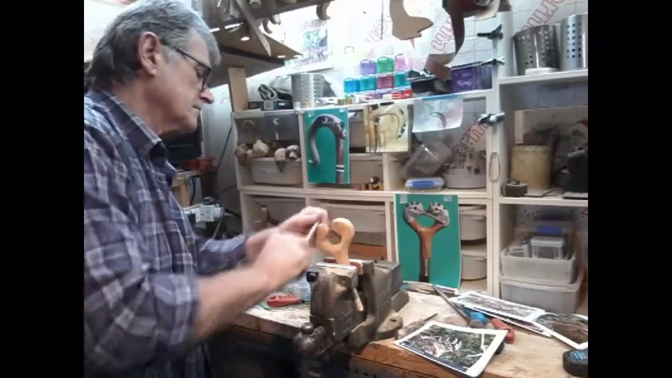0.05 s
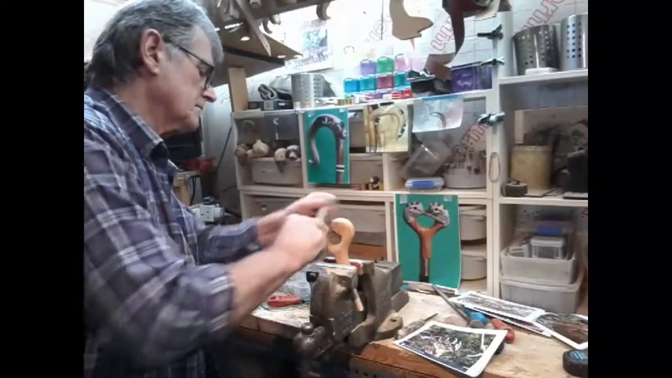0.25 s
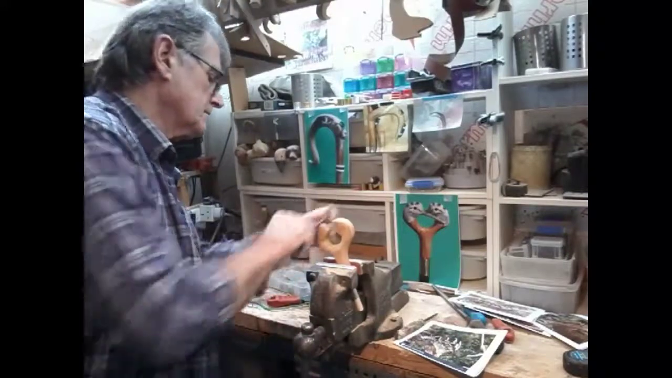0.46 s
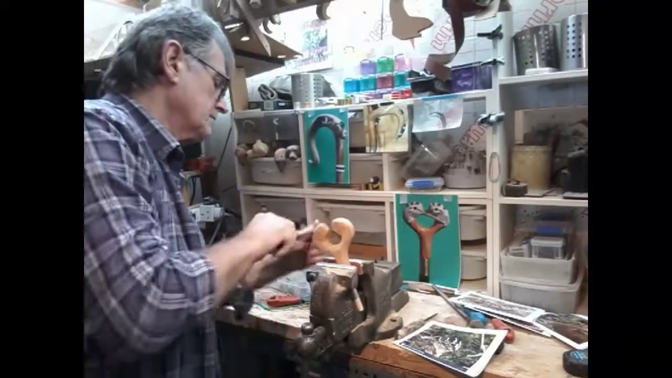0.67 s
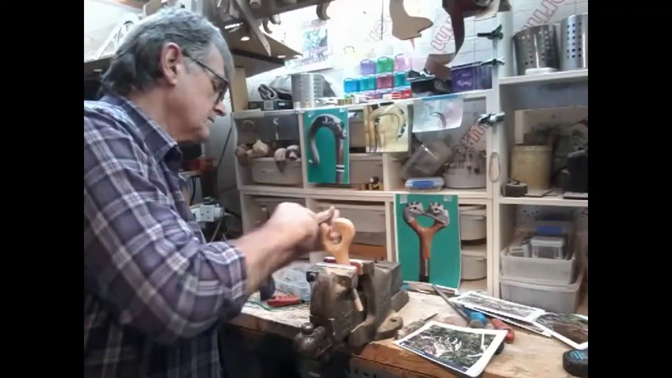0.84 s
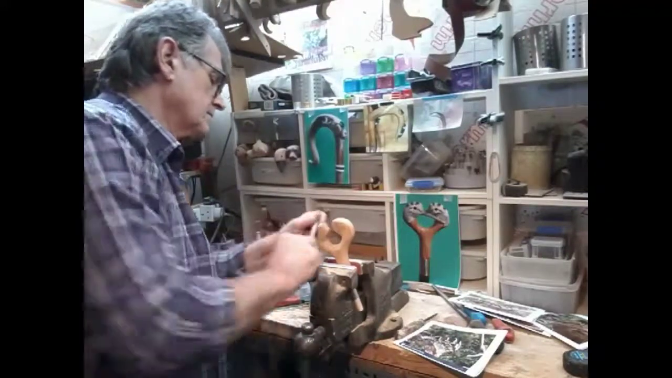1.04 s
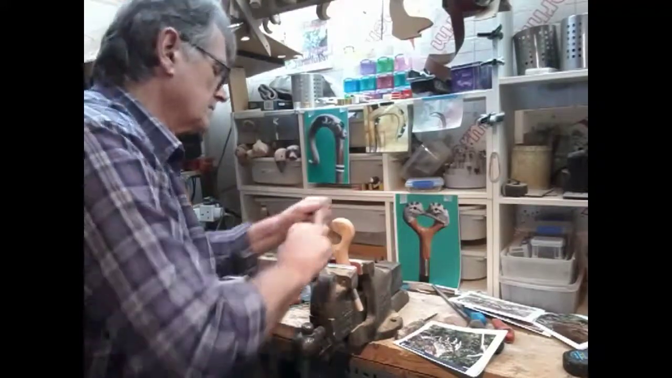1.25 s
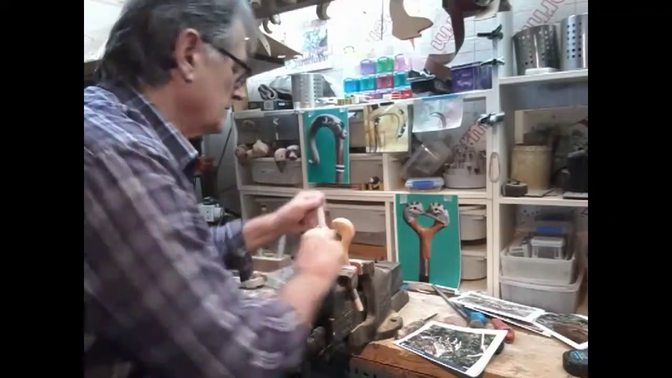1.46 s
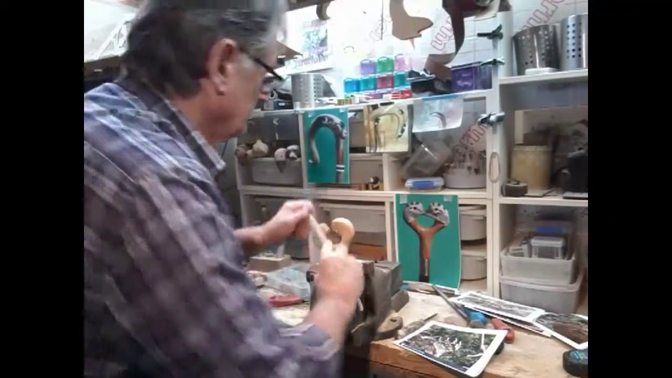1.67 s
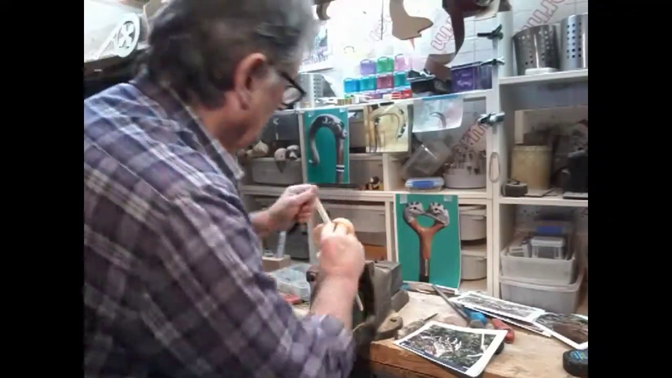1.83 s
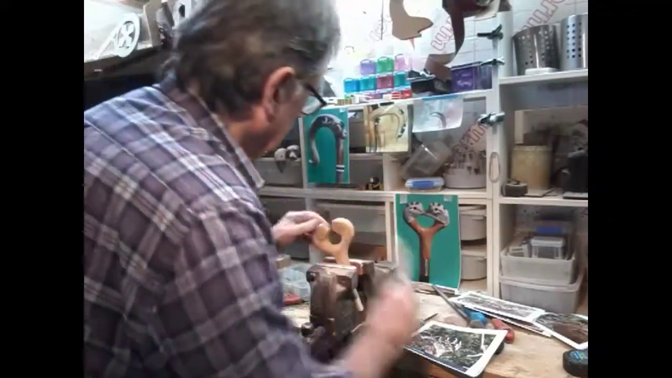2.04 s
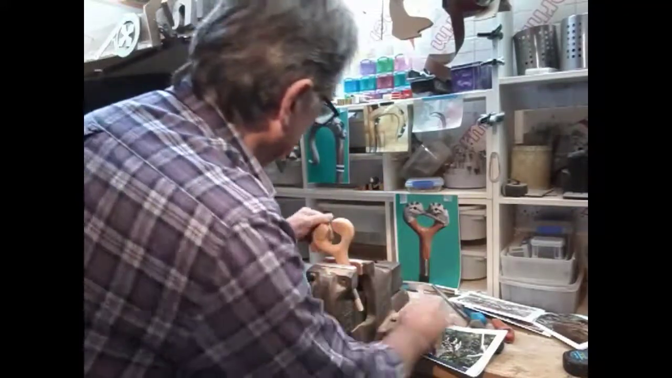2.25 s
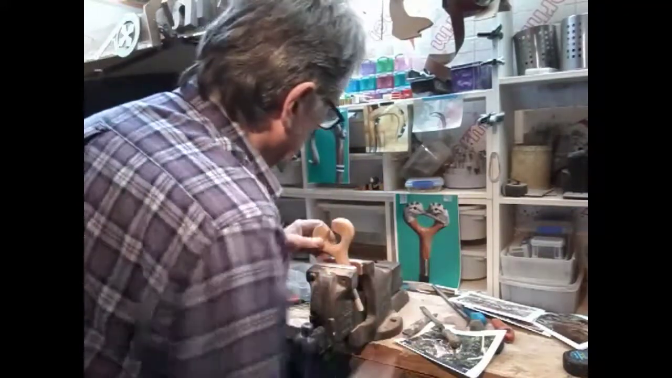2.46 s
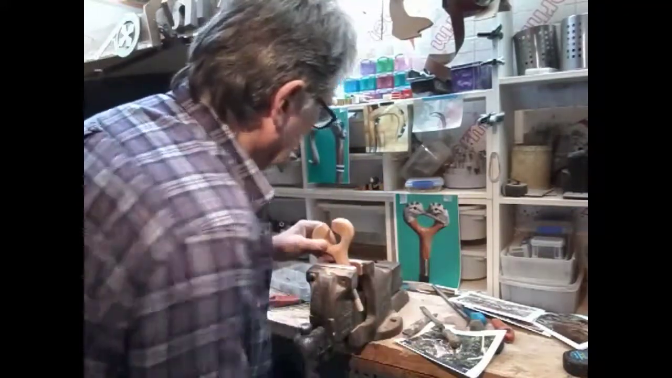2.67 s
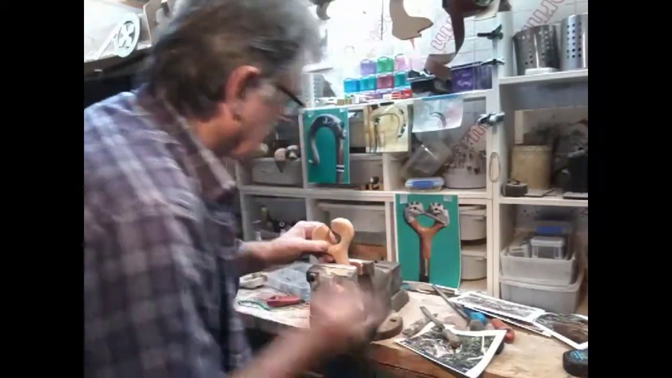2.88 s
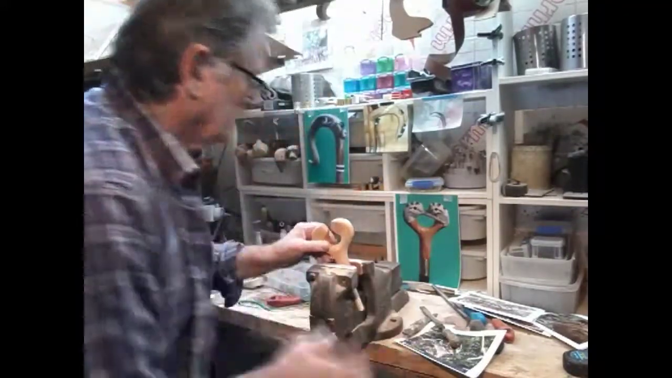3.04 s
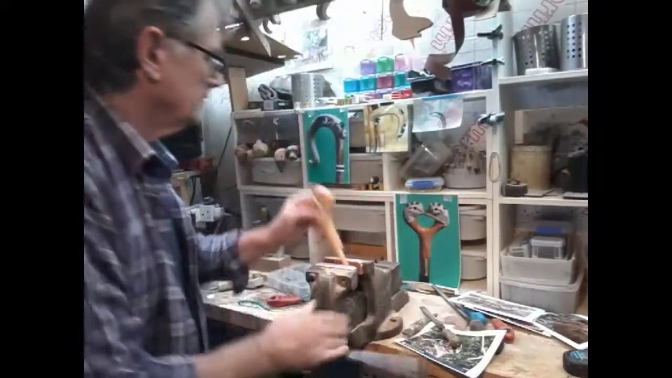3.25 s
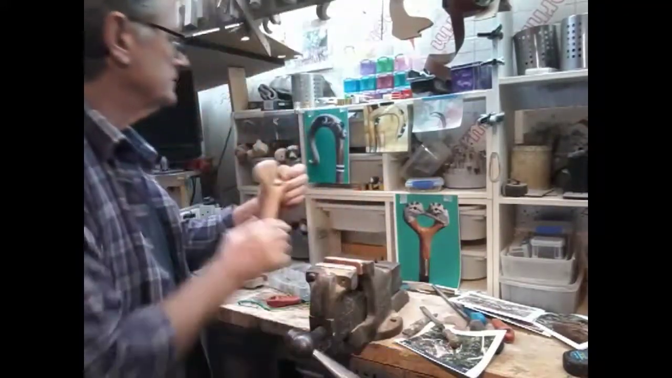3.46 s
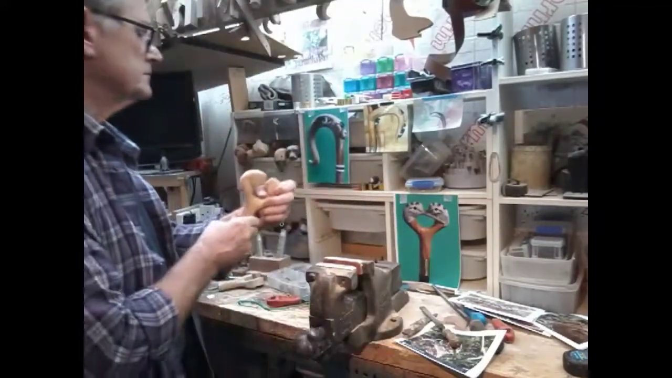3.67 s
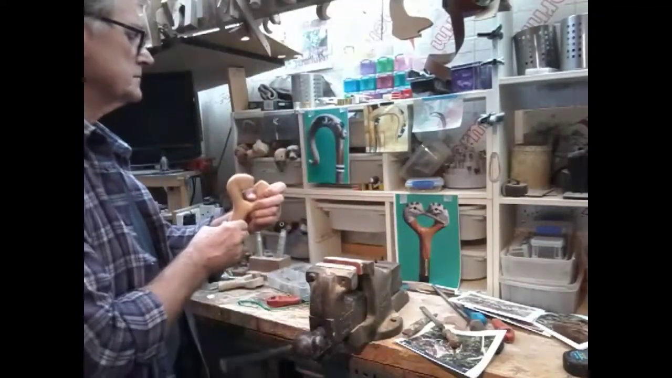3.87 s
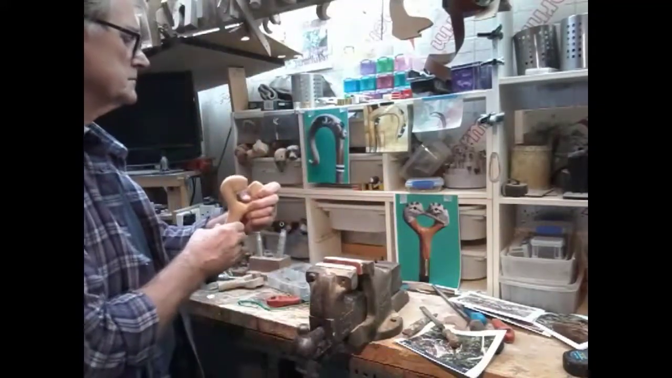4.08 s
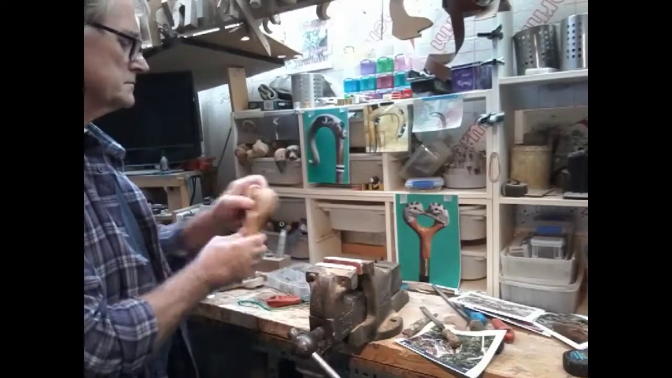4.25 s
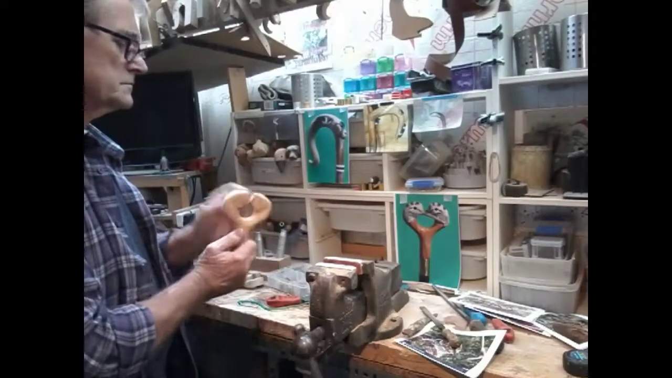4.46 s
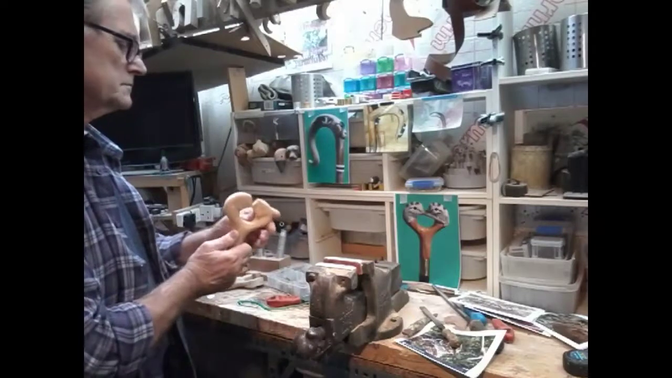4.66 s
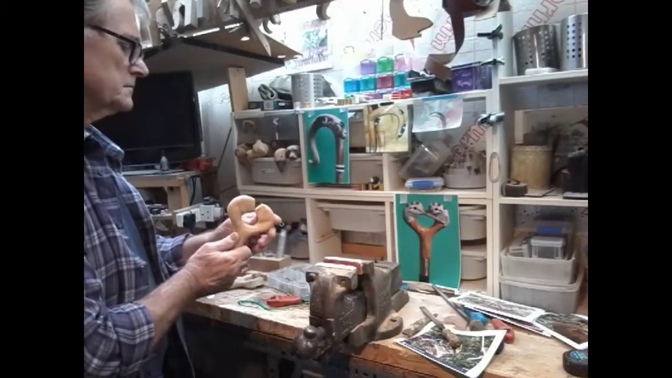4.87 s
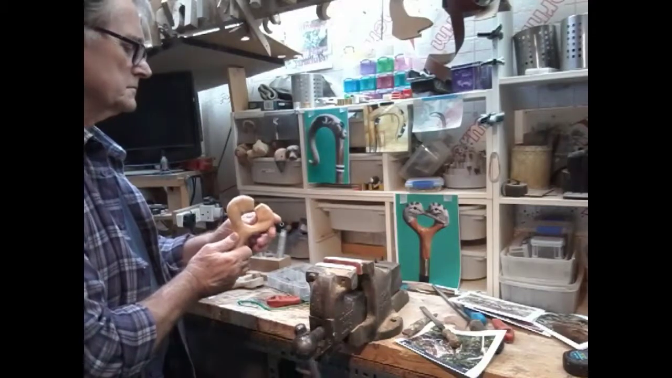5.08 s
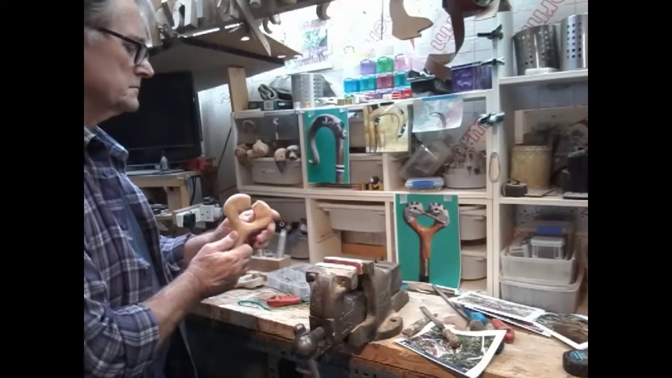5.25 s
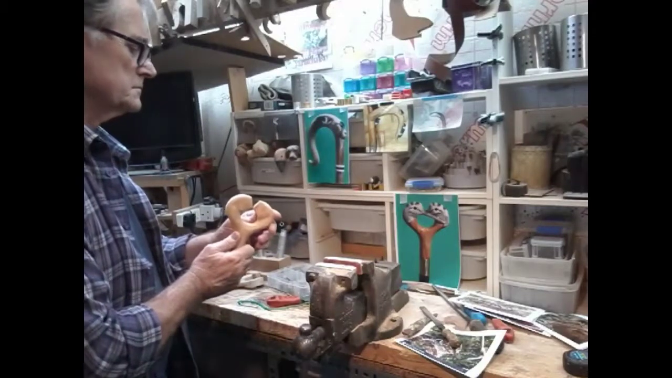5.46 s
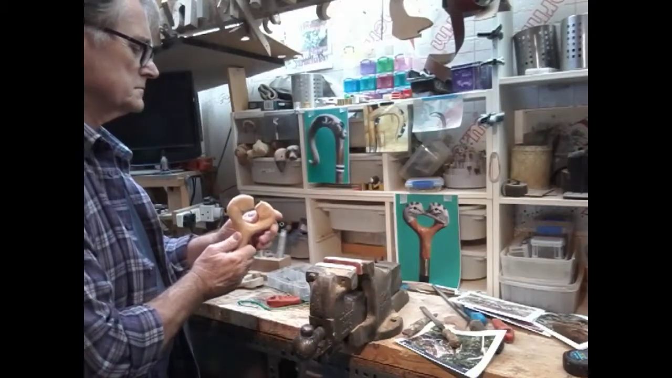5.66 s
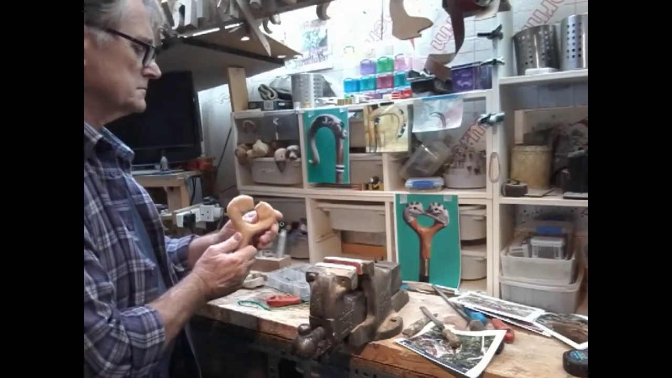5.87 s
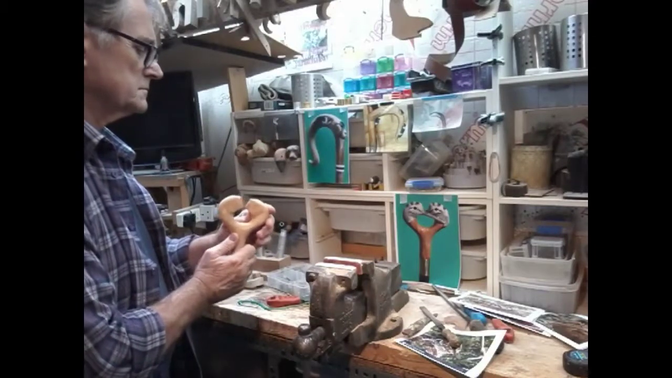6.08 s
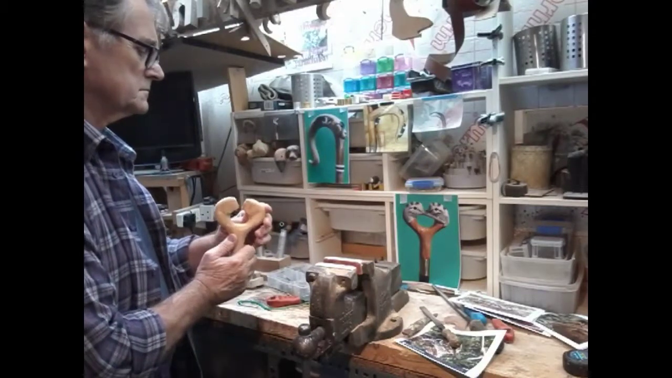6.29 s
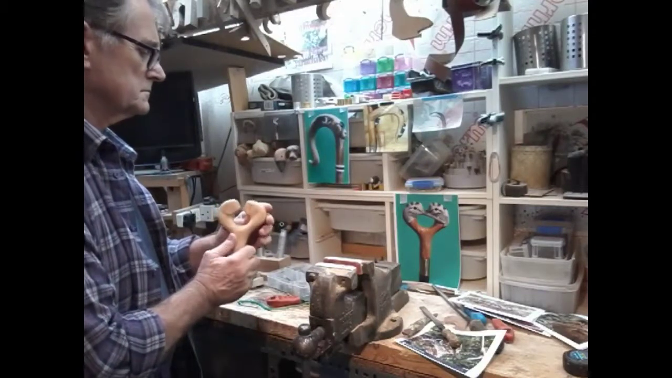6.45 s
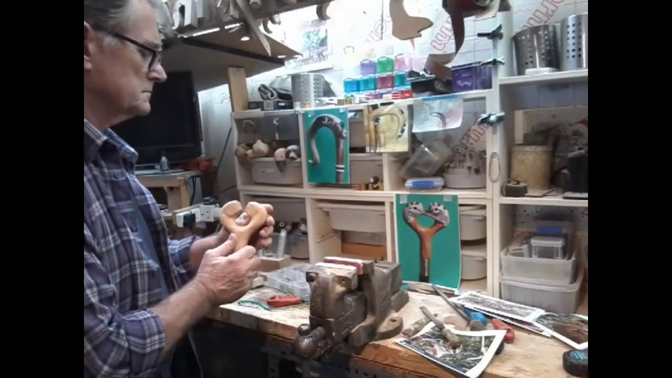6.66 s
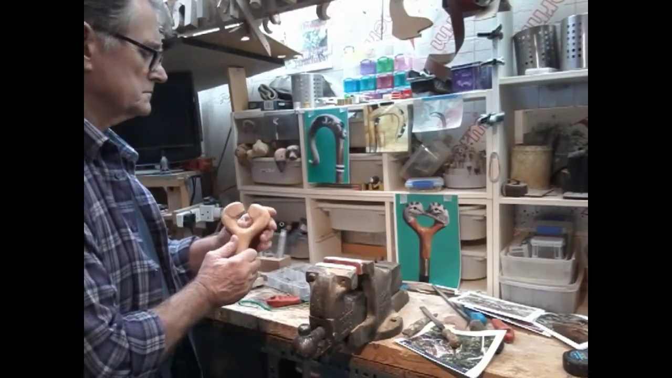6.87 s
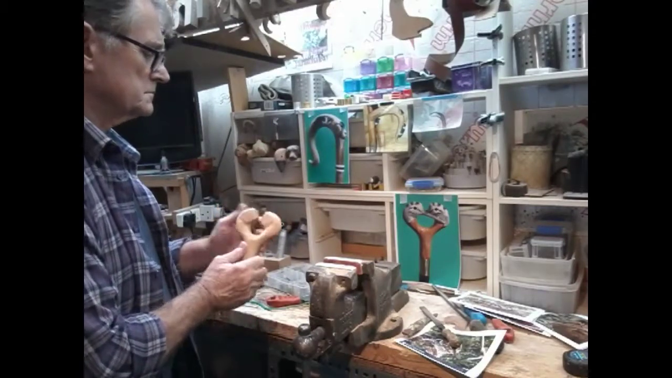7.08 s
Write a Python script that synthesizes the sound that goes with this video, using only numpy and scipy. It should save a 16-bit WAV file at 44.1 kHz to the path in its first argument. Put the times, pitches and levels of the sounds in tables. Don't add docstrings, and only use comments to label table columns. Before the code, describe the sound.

Close to a small microphone, six short strokes of a file scrape wood, gritty and woody with a metallic ring, about three a second. After faint hand rubbing comes a hard clatter of steel on the bench, then thuds, knocks and jingles of a vise loosening. Isolated handle clinks follow at irregular gaps, softening into near quiet, with short dull reflections, quiet rumble, hiss and a very high, faint whine.

```python
import sys
import numpy as np
from scipy import signal
from scipy.io import wavfile

SR = 44100
rng = np.random.default_rng(int(sys.argv[2]) if len(sys.argv) > 2 else 0)


def field_ratio(decibels):
    return 10 ** (np.asarray(decibels, dtype=float) / 20)


def store_pcm(level_fs):
    pcm = np.round(np.clip(level_fs, -1, 1) * 32767).astype(np.int16)
    wavfile.write(sys.argv[1], SR, np.atleast_2d(pcm).T)


N = 313992

# time_s, level_db
RUMBLE_LEVEL = [(0.0, -51.5), (0.65, -53.5), (1.03, -48), (1.29, -51.5), (1.49, -54), (2.3, -54.5),
                (2.85, -44), (4.24, -53), (4.42, -51), (4.86, -55), (5.73, -55), (6.43, -58), (6.86, -55.5),
                (7.12, -52.5)]
# frequency_hz, density_db_per_hz
RUMBLE_COLOUR = [(15, -58), (25, -18), (86, -3), (182, -5), (207, -1.5), (279, -13), (422, -12.5),
                 (532, -18.5), (1030, -25), (1120, -22), (1300, -38), (1690, -42), (2860, -120)]
# frequency_hz, density_db_per_hz
HISS_COLOUR = [(590, -44.5), (1000, -6), (1090, -2), (1320, -14.5), (2890, -17), (5110, -21.5),
               (13000, -22.5)]
# pitch_hz, rms_db
WHINE_TONE = [(13679, -56)]
# start_s, level_db, bass_share_db, treble_share_db, t60_s
LANDINGS_ON_WOOD = [
    (0.0367, -37, 8, -16, 0.13),
    (0.3761, -28.5, -9, -14, 0.15),
    (0.6516, -50, 17, -45, 0.27),
    (1.012, -30.5, -10, -2, 0.16),
    (1.3581, -25, -14, -1.5, 0.12),
    (1.5439, -62.5, 12, 19, 0.096),
    (1.634, -31, -2, -27, 0.077),
]
# frequency_hz, density_db_per_hz
LANDING_COLOUR = [(180, -54), (300, -4), (561, -7.5), (1160, -3), (1680, 2), (3300, -9), (4100, -14.5),
                  (6220, -23), (9000, -62), (11700, -74), (19800, -120)]
# bite_s, fastest_s, lift_s, rasp_db, tooth_hiss_db
FILE_STROKES = [
    (0.081, 0.155, 0.21, -34, -50.5),
    (0.382, 0.451, 0.52, -34, -51),
    (0.699, 0.762, 0.85, -32, -46.5),
    (1.047, 1.099, 1.166, -34.5, -48),
    (1.368, 1.414, 1.466, -35.5, -53),
    (1.661, 1.714, 1.815, -42, -55),
]
# landing_s, landing_db, landing_hz, pressed_db, pressed_hz
WOOD_BOOMS = [(0.043, -32.5, 455, -40, 616.7), (0.376, -36, 499.2, -50.5, 514.3),
              (0.652, -33.5, 484.5, -39.5, 557.7), (1.012, -45, 477, -35.5, 573.3),
              (1.357, -32, 540.3, -45, 538), (1.634, -37, 544.5, -43.5, 620)]
# frequency_hz, width_hz, level_db
BLADE_MODES = [(1423, 18, 8), (1680, 89, -10), (1714, 37, 12.5), (2020, 7.7, 6.5), (2313, 9.6, -6),
               (2444, 15, -14), (2580, 30, -22.5), (2800, 25, -5), (3070, 15, -1), (3530, 64, 3)]
# frequency_hz, density_db_per_hz
RASP_COLOUR = [(410, -35), (700, -5.5), (1090, -20), (1420, -2), (1550, -13.5), (1990, -2.5), (4500, -24.5),
               (5850, -21), (9900, -120)]
# frequency_hz, density_db_per_hz
TOOTH_COLOUR = [(3000, -28), (4200, -13), (5500, 4), (7500, -4), (10000, 1), (12500, -16), (14000, -25),
                (16000, -40)]
# middle_s, half_length_s, pitch_hz, level_db
SINGING_MOMENTS = [(0.054, 0.014, 1450, -42.5), (0.153, 0.042, 870, -47.5), (0.161, 0.016, 2314, -45),
                   (0.415, 0.019, 1728, -51), (0.45, 0.032, 2020, -56), (0.486, 0.0099, 560, -42.5),
                   (0.756, 0.019, 1574, -46), (0.766, 0.027, 2030, -45), (0.808, 0.026, 570, -36),
                   (0.887, 0.026, 1410, -54), (1.05, 0.02, 1718, -40.5), (1.098, 0.02, 1980, -51),
                   (1.132, 0.025, 1400, -45), (1.15, 0.023, 2313, -43.5), (1.433, 0.032, 2300, -48.5),
                   (1.445, 0.036, 2020, -48.5), (1.695, 0.019, 2403, -44.5), (1.707, 0.013, 1177, -54),
                   (1.767, 0.025, 1438, -49.5)]
# middle_s, half_length_s, level_db
RUBS = [(1.892, 0.1, -64), (2.007, 0.019, -70), (2.103, 0.052, -64.5), (2.237, 0.089, -66.5),
        (4.1, 0.15, -72.5), (4.194, 0.02, -76), (4.605, 0.089, -73), (4.908, 0.12, -74.5),
        (6.435, 0.045, -74), (6.528, 0.03, -76), (6.957, 0.1, -73.5)]
# frequency_hz, density_db_per_hz
RUB_SPECTRUM = [(530, -57), (900, 4), (1450, 1), (1560, -0.5), (1740, 2), (4060, -9.5), (6060, -3.5),
                (7370, -10), (12000, -6), (15600, -56), (22000, -120)]
# start_s, level_db, bass_share_db, treble_share_db, t60_s
FILE_FALLS = [
    (2.299, -22, 3, -13, 0.19),
    (2.306, -25, -10, 1, 0.11),
    (2.385, -23.5, -1.5, 3, 0.13),
]
# frequency_hz, density_db_per_hz
FALL_COLOUR = [(80, -29), (177, -7), (400, -2.5), (1450, -3.5), (2400, -8), (3050, -15.5), (4500, -6),
               (6300, -9.5), (8300, -14.5), (9500, -17), (16000, -23.5)]
# start_s, peak_db, low_db, middle_db, high_db
DROPPED_FILE_HITS = [
    (2.3004, -21.5, 5, -1.5, -8),
    (2.3052, -5, -3, -4.5, -7),
    (2.3865, -17.5, -3, -7.5, 8.5),
]
# frequency_hz, level_db, t60_s, group
DROPPED_FILE_MODES = [(960, -6, .1, 0), (1470, -3, .12, 0), (2530, -10, .12, 0), (4371, -4, .14, 1),
                      (4522, -8, .12, 1), (4760, -3, .14, 1), (5152, -4, .1, 1), (6150, -8, .1, 2),
                      (6650, -8, .16, 2), (7050, -2, .09, 2), (7400, -3, .1, 2), (8670, -5, .08, 2),
                      (9071, -2, .08, 1)]
# start_s, level_db, bass_share_db, treble_share_db, t60_s
VISE_BLOWS = [(2.624, -45.5, -6, -45.5, 1), (2.649, -19, 0, -3, 0.14), (2.735, -35, 11.5, -14.5, 0.1),
              (2.774, -57, 1, -8, 0.64), (2.89, -39.5, -1, -12.5, 0.6), (2.956, -31.5, -3, -18, 0.11),
              (3.069, -38.5, 4.5, -28.5, 0.49), (3.097, -30.5, -13, -3, 0.16),
              (3.222, -35, -11, -0.5, 0.11), (3.327, -38, -7, -6, 0.16), (3.376, -34.5, -4.5, -9.5, 0.3),
              (3.527, -47, 12, -2, 0.21), (3.621, -37.5, -3.5, -9.5, 0.23)]
# start_s, level_db, bass_share_db, treble_share_db, t60_s
HANDLE_SWINGS = [(3.828, -61, 4, -25, 0.28), (3.878, -54.5, 9, -41, 0.18), (4.208, -51.5, 8.5, -21, 0.22),
                 (4.248, -41.5, 0.5, -3.5, 0.25), (4.466, -61.5, -7, -15, 0.16),
                 (4.713, -62, 7.5, -18.5, 0.48), (4.801, -47, -2, -31, 0.15), (5.064, -54, 5, -32, 0.39),
                 (5.24, -56, 12.5, 4, 0.3), (5.266, -34.5, -27, -11, 0.18), (5.531, -55.5, 4, -16, 0.12),
                 (5.681, -43.5, -13.5, -15.5, 0.26), (6.122, -46.5, -9.5, -17, 0.2)]
# frequency_hz, density_db_per_hz
KNOCK_COLOUR = [(59, -42), (100, -16), (159, -6.5), (380, -5), (702, -1.5), (1570, -8), (1710, -5.5),
                (1820, -5.5), (2900, -8.5), (6220, -5), (8000, -13), (15800, -28)]
# start_s, peak_db, pitch_hz
BENCH_THUDS = [(2.647, -14, 732), (2.657, -10.5, 750), (2.675, -17, 670), (2.679, -20, 170),
               (2.689, -23, 197), (2.733, -15.5, 238), (2.739, -18.5, 457), (2.749, -27, 400),
               (2.81, -29, 192), (2.85, -35, 390), (2.776, -18, 205.5), (3.076, -21, 428),
               (3.089, -19.5, 428), (3.112, -19, 750), (3.114, -30, 221), (3.168, -25.5, 200),
               (3.22, -31, 336), (3.439, -29, 427), (3.46, -28, 250), (3.838, -42, 163.7),
               (3.891, -38, 192), (3.819, -37.5, 650), (3.832, -36, 598), (3.883, -37, 580),
               (3.875, -36, 150), (3.886, -35, 970), (3.897, -37, 593), (3.897, -46, 930),
               (3.906, -47, 623), (3.906, -44, 1000), (3.929, -48, 910), (3.846, -48, 630),
               (4.252, -32, 920), (4.255, -31, 307), (4.714, -41.5, 990), (4.806, -50, 844)]
# start_s, third_mode_db, first_relative_db, second_relative_db
HANDLE_BAR_HITS = [(2.6466, -33, -32, 13.5), (2.656, -28.5, -29.5, 0.5), (2.698, -40, -11, 12),
                   (2.7445, -45, -16.5, -19.5), (2.89, -32, 10.5, 3.5), (2.9038, -28.5, 0, -11),
                   (2.964, -33.5, -5, 6.5), (3.0983, -33, 6, 6.5), (3.107, -30.5, -8.5, 0),
                   (3.116, -25, -26, -41), (3.3262, -56, 24.5, -2), (3.3765, -26.5, 1, -17.5),
                   (3.382, -28, -7.5, -2), (3.392, -36, -14, -16.5), (3.4, -31.5, -16, -21),
                   (3.644, -49, -20, 9), (3.8092, -75.5, 30, 12), (3.829, -83, 31, 14),
                   (3.885, -68, 25.5, 9), (3.9, -77.5, 19, 8), (4.2525, -34.5, -3.5, -5),
                   (4.722, -79, 23, 24), (4.808, -61.5, 4.5, 14), (5.114, -57.5, -4, 1),
                   (5.123, -65, 17, 21.5), (5.2412, -34.5, 2, 1), (5.247, -29.5, -0.5, -6.5),
                   (5.6826, -43, -1, 6), (5.699, -40.5, -4, 11), (5.756, -49.5, -13.5, -4),
                   (6.124, -59, 13, -3)]
# first_mode_hz, second_mode_hz, third_mode_hz
HANDLE_BAR_PITCHES = [(2102, 3999, 6255), (2102, 4015, 6380), (2137, 4010, 6406), (2059, 3908, 6328),
                      (2005, 3983, 6328), (2005, 3983, 6333), (2094, 4050, 6309), (2021, 3886, 6344),
                      (2021, 3990, 6344), (2029, 3884, 6338), (2137, 4002, 6279), (2061, 4013, 6465),
                      (2061, 4013, 6420), (2061, 4013, 6451), (2064, 4015, 6451), (2021, 4015, 6314),
                      (2002, 3989, 6441), (2002, 3960, 6441), (2110, 4064, 6282), (2110, 4064, 6282),
                      (1999, 3945, 6309), (2032, 3959, 6411), (2104, 4072, 6476), (2032, 3980, 6427),
                      (2050, 4005, 6427), (2075, 3983, 6430), (2069, 3989, 6430), (2013, 4013, 6392),
                      (2067, 4018, 6424), (2067, 4021, 6438), (2091, 3964, 6290)]
# offset_from_pitch_hz, level_db, t60_s, bending_mode; the top modes (3) are true pitches
HANDLE_BAR_MODES = [(0, -3, .13, 0), (55, -14, .07, 0), (0, -2, .17, 1), (80, -13, .07, 1), (0, 3, .12, 2),
                    (-55, -9, .1, 2), (50, -8, .09, 2), (8320, 6, .08, 3), (8950, 3, .09, 3),
                    (9240, 11, .07, 3), (12960, -2, .08, 3)]
# start_s, lost_db
HANDLE_BAR_CHOKES = [(3.132, 9), (3.412, 9), (3.896, 12.5), (4.852, 9), (5.148, 6), (5.268, 6),
                     (5.281, 4.5), (5.693, -1), (5.748, 9)]
# start_s, low_db, middle_db, high_db, top_db
SCREW_END_HITS = [(2.646, -50, -48, -29, -29), (2.744, -61, -56, -44, -35), (3.102, -63, -55, -35, -45),
                  (3.117, -64, -55, -51, -44), (3.53, -44, -42, -47, -37), (3.6175, -48, -39.5, -33.5, -30),
                  (4.2073, -56.5, -60, -70.5, -67), (4.2537, -64.5, -48, -38, -41),
                  (4.465, -67, -56, -61, -64), (4.716, -65, -64.5, -70, -64), (4.804, -69, -52, -60.5, -59),
                  (5.0698, -60, -57, -72, -75), (5.2615, -41.5, -38.5, -39.5, -34),
                  (5.5345, -56.5, -52.5, -60, -61.5), (5.6847, -62.5, -47, -49.5, -66.5),
                  (5.713, -53, -48, -58, -69), (5.752, -61.5, -63, -69, -72), (5.986, -73, -58, -72, -73),
                  (6.123, -59.5, -47, -59, -57.5)]
# frequency_hz, level_db, t60_s, group
SCREW_MODES = [(1717, -1, .12, 0), (1766, 3, .13, 0), (2610, -1, .1, 1), (3168, -10, .09, 1),
               (3482, -11, .08, 1), (4200, -2, .1, 2), (4530, -4, .14, 2), (5460, -15, .07, 3),
               (5826, -4, .055, 3), (8350, -14, .06, 3), (10520, -20, .12, 3)]
# start_s, low_db, middle_db, high_db, top_db
VISE_BODY_HITS = [(2.648, -40, -21, -25, -29.5), (2.747, -57, -60, -46, -62),
                  (2.89, -60.5, -47.5, -53, -64), (2.959, -25, -39.5, -47, -68),
                  (3.1, -37.5, -37, -53, -63), (3.383, -40, -61, -42, -52), (3.6194, -70, -48, -44.5, -72)]
# frequency_hz, level_db, t60_s, group
VISE_MODES = [(1175, -3, .11, 0), (1716, 0, .13, 1), (2470, 3, .06, 2), (3050, -3, .07, 2),
              (3230, 0, .08, 2), (3690, -3, .1, 2), (7830, 11, .05, 3), (8330, 10, .06, 3),
              (8520, 13, .05, 3)]
# start_s, lost_db
VISE_BODY_CHOKES = [(2.678, 4), (2.705, 8)]
# start_s, peak_db, pitch_hz, t60_s
STEEL_PINGS = [(2.746, -52, 10520, .1), (2.891, -49, 10450, 0.17), (2.891, -53, 8960, 0.11),
               (3.378, -45, 10560, .08), (3.486, -53, 11200, .07), (3.622, -46, 10470, .25),
               (5.684, -61, 9230, .12)]
# frequency_hz, width_hz, gain_db
MIC_PORTS = [(6080, 600, 10.42), (12200, 710, 12)]
EDGES_HZ = 28 * 2 ** np.arange(0, 9.4, 1 / 3)


def rms_one(x):
    return x / np.sqrt(np.mean(x ** 2) + 1e-20)


def in_time(rows):
    return field_ratio(np.interp(np.arange(N) / SR, *np.transpose(rows)))


def at_hz(points, hz):
    points_hz, points_db = np.transpose(points)
    return np.interp(np.log(hz), np.log(points_hz), points_db, left=-90)


def filtered(x, order, hz, kind="low"):
    return signal.sosfilt(signal.butter(order, hz, kind, fs=SR, output="sos"), x)


def drift(rate):
    r = np.exp(-80 * np.pi * rate / SR)
    slow = signal.lfilter([1], [1, -2 * r, r * r], rng.standard_normal(N // 40 + 2002))[2000:]
    return np.interp(np.arange(N) / 40, np.arange(len(slow)), rms_one(slow))


def bands(x, spectrum):
    for k, (low, high) in enumerate(zip(EDGES_HZ, EDGES_HZ[1:])):
        centre_hz = np.sqrt(low * high)
        db = at_hz(spectrum, centre_hz)
        if db > -70:
            yield centre_hz, field_ratio(db) * filtered(x[k % 2], 2, [low, high], "band")


def coloured(x, spectrum, patchy_db, rate):
    return rms_one(sum(part * field_ratio(patchy_db * drift(rate)) for hz, part in bands(x, spectrum)))


def coloured_noise(spectrum, patchy_db, rate):
    return coloured(rng.standard_normal((2, N)), spectrum, patchy_db, rate)


def grains(per_s, spread_db):
    sizes = field_ratio(spread_db * np.minimum(rng.exponential(1, (2, N)), 5))
    sizes *= rng.choice([-1, 1], (2, N))
    return sizes * (rng.random((2, N)) < per_s / SR)


def resonance(x, hz, width):
    r = np.exp(-np.pi * width / SR)
    peak = np.array([1, 0, -1]) * (1 - r * r) / 2
    return signal.lfilter(peak, [1, -2 * r * np.cos(2 * np.pi * hz / SR), r * r], x)


def rumble():
    return in_time(RUMBLE_LEVEL) * coloured_noise(RUMBLE_COLOUR, patchy_db=3.0, rate=18.0)


def electronics():
    hiss = field_ratio(-71) * coloured_noise(HISS_COLOUR, patchy_db=2.5, rate=9.5)
    hz, db = WHINE_TONE[0]
    phase = 2 * np.pi * np.cumsum(hz + 3 * drift(3)) / SR
    return hiss + np.sqrt(2) * field_ratio(db + 0.65 * drift(8)) * np.sin(phase)


def blows(hits, spectrum, colour_hz, rise_cycles, slow_bass, snap_db, gain_db, strike):
    out, age = np.zeros(N), np.arange(SR // 3) / SR
    snap = 1 + field_ratio(snap_db - 12000 * age)
    rattle = rms_one(grains(9000, spread_db=3))
    rattle[:, [round(s * SR) + 2 for s, *_ in hits]] = strike
    for hz, part in bands(rattle, spectrum):
        shape = np.zeros(N + len(age))
        rise = (snap if hz > 900 else 1) * (1 - np.exp(-age * hz / rise_cycles))
        for s, peak_db, low_db, high_db, t60 in hits:
            db = peak_db + gain_db + np.interp(np.log(hz), np.log(colour_hz), [low_db, 0, high_db])
            db += max(peak_db + 31, 0) * max(np.log2(hz / 6500), 0) * 1.2
            band_t60 = max(t60, .02) * (1000 / hz) ** slow_bass
            shape[round(s * SR):][:len(age)] += rise * field_ratio(db - 60 * age / band_t60)
        out += part * shape[:N]
    return out


def file_landings():
    return blows(LANDINGS_ON_WOOD, LANDING_COLOUR, [500, 2000, 6000], rise_cycles=0.25,
                 slow_bass=0.083, snap_db=-7.5, gain_db=7.0, strike=32)


def stroke_levels():
    bite_time_s, lift_loss_db, lift_fade_db_per_s = 0.035, 18.5, 304
    rasp_bite_loss_db, hiss_bite_loss_db = 11.5, 15
    boom_rise_s, boom_fade_db_per_s = 0.011, 330
    press_db_per_s, release_db_per_s = 67, 373
    t, boom, rasp, hiss, pitch = np.arange(N) / SR, 0, 0, 0, []
    for stroke, wood in zip(FILE_STROKES, WOOD_BOOMS):
        bite, fastest, lift, rasp_db, hiss_db = stroke
        land, land_db, land_hz, press_db, press_hz = wood
        corners = [bite - bite_time_s, bite, fastest, lift, lift + 1]
        after = [0, -lift_loss_db, -lift_loss_db - lift_fade_db_per_s]
        speed = field_ratio(np.interp(t, corners, [-70, -rasp_bite_loss_db, *after]))
        bright = field_ratio(np.interp(t, corners, [-70, -hiss_bite_loss_db, *after]))
        rasp = rasp + field_ratio(rasp_db) * speed
        hiss = hiss + field_ratio(hiss_db) * bright ** 0.6
        age = np.maximum(t - land, 0)
        fade_db = boom_fade_db_per_s * np.maximum(age - boom_rise_s, 0)
        boom = boom + np.minimum(age / boom_rise_s, 1) * field_ratio(land_db - fade_db)
        pressed_db = np.where(t < lift, press_db_per_s * (t - lift), release_db_per_s * (lift - t))
        boom = boom + (t > bite) * field_ratio(press_db + pressed_db)
        pitch += [(land + 0.0416, land_hz), (fastest, press_hz), (lift + .08, press_hz)]
    return boom, rasp, hiss, np.interp(t, *np.transpose(sorted(pitch)))


def carving_boom(teeth, boom_hz, width_hz):
    slow = filtered(teeth[0] + 1j * teeth[1], 2, width_hz / 2)
    slow /= np.sqrt(np.abs(slow) + 1e-9)
    turning = np.exp(2j * np.pi * np.cumsum(boom_hz + 40 * drift(11.97)) / SR)
    return rms_one((slow * turning).real * field_ratio(2.5 * drift(30)))


def blade_rasp(teeth):
    blade = 0
    for k, (hz, width, db) in enumerate(BLADE_MODES):
        swell = field_ratio(db + 3 * drift(22))
        blade = blade + (-1) ** k * swell * rms_one(resonance(teeth[0], hz, 2.6 * width))
    fibres = coloured(teeth, RASP_COLOUR, patchy_db=4.5, rate=3.8)
    return rms_one(rms_one(blade) + field_ratio(0.5) * fibres)


def tooth_hiss(teeth, level):
    bright = coloured(teeth, TOOTH_COLOUR, patchy_db=1.0, rate=25)
    bright += .9 * resonance(bright, 6100, 600)
    bright = rms_one(bright + 0.82 * resonance(bright, 11700, 350))
    top = filtered(bright, 2, 7600, "high")
    top_lost = 1 - np.minimum(level / field_ratio(-71), 1) ** 0.3
    return level * (bright - top * top_lost)


def filing():
    boom, rasp, hiss, boom_hz = stroke_levels()
    teeth = grains(4000, spread_db=3.5)
    wood = boom * carving_boom(teeth, boom_hz, width_hz=151)
    return wood + rasp * blade_rasp(teeth) + tooth_hiss(teeth, hiss)


def singing():
    out, teeth = np.zeros(N), grains(6000, spread_db=3.5)[0]
    for s, half, hz, db in SINGING_MOMENTS:
        span = slice(max(round((s - .1) * SR), 0), round((s + .1) * SR))
        t = np.arange(span.start, span.stop) / SR
        swell = field_ratio(db) * np.exp(-((t - s) / half) ** 2)
        out[span] += swell * rms_one(resonance(teeth[span], hz, 41))
    return out


def rubbing():
    t = np.arange(N) / SR
    level = sum(field_ratio(db) * np.exp(-((t - s) / half) ** 2) for s, half, db in RUBS)
    return level * coloured_noise(RUB_SPECTRUM, patchy_db=2.5, rate=3.0)


def clinks(hits, modes, damping, chatter_s, spread_db, gain_db, rough_db, pitches=None, chokes=()):
    out, size = np.zeros(N + SR), SR // 3
    contact_db = np.array([4.5, -12, -14, -15, -16, -17])
    waver = [drift(70) for _ in range(4)]
    for i, (s, peak_db, *group_db) in enumerate(hits):
        at = (rng.random(6) * chatter_s * [0, 1, 1, 1, 1, 1] * SR).astype(int)
        start = round(s * SR)
        span = slice(start, start + size)
        t = s + np.arange(size) / SR
        kept = field_ratio(-sum(lost_db * np.clip((t - when) / .004, 0, 1) for when, lost_db in chokes if when > s))
        for k, (hz, db, t60, group) in enumerate(modes):
            hz += pitches[i][group] if pitches else 0
            strength_db = peak_db + group_db[group] + db + gain_db + contact_db
            clicks = np.full(size, 1e-18)
            np.add.at(clicks, at, field_ratio(strength_db + spread_db * rng.standard_normal(6)))
            r, w = field_ratio(-60 * damping / (t60 * SR)), 2 * np.pi * hz / SR
            ringing = signal.lfilter([0, np.sin(w)], [1, -2 * r * np.cos(w), r * r], clicks)
            out[span] += kept * resonance(ringing, hz, 280) * field_ratio(rough_db * waver[k % 4][span])
    return out[:N]


def file_falls():
    return blows(FILE_FALLS, FALL_COLOUR, [400, 2000, 12000], rise_cycles=0.9,
                 slow_bass=0.095, snap_db=-5.5, gain_db=11.5, strike=17)


def dropped_file():
    return clinks(DROPPED_FILE_HITS, DROPPED_FILE_MODES, damping=1.4, chatter_s=0.012,
                  spread_db=4.0, gain_db=-25, rough_db=4)


def vise_knocks():
    return blows(VISE_BLOWS + HANDLE_SWINGS, KNOCK_COLOUR, [400, 2000, 12000], rise_cycles=1.0,
                 slow_bass=0.13, snap_db=-12.5, gain_db=13.0, strike=4)


def handle():
    let_go_s, uneven_db = 3.7, 1.2
    top_db, top_growth = 6.5, 2.09
    bar_rows = []
    for s, db, first, second in HANDLE_BAR_HITS:
        bar_rows.append((s, db, first, second, 0, top_growth * (db + second) - db + top_db))
    screw_rows = [(s, 0, *levels) for s, *levels in SCREW_END_HITS]
    out = np.zeros(N)
    for held, damping, rocking_db in ((True, 1.1, 4.5), (False, .9, 1.8)):
        bar = [row for row in bar_rows if (row[0] < let_go_s) == held]
        screw = [row for row in screw_rows if (row[0] < let_go_s) == held]
        pitches = [(*hz, 0) for hz, row in zip(HANDLE_BAR_PITCHES, bar_rows) if (row[0] < let_go_s) == held]
        out += clinks(bar, HANDLE_BAR_MODES, damping, chatter_s=.018, spread_db=uneven_db, gain_db=-9.5,
                      rough_db=rocking_db, pitches=pitches, chokes=HANDLE_BAR_CHOKES)
        out += clinks(screw, SCREW_MODES, damping, chatter_s=0.012, spread_db=uneven_db, gain_db=-6.5,
                      rough_db=2.5)
    return out


def thuds():
    out, age = np.zeros(N), np.arange(SR // 5) / SR
    for s, db, hz in BENCH_THUDS:
        ringing = np.sin(2 * np.pi * hz * age) + 0.13 * np.sin(3.1 * np.pi * hz * age)
        fade_db = 60 * age * np.sqrt(200 * hz) / 9.2
        out[round(s * SR):][:len(age)] += field_ratio(db - 6.5 - fade_db) * ringing
    return out


def vise_body():
    hits = [(s, 0, *levels) for s, *levels in VISE_BODY_HITS]
    return clinks(hits, VISE_MODES, damping=1.1, chatter_s=0.012, spread_db=1.0, gain_db=-4.0,
                  rough_db=2.5, chokes=VISE_BODY_CHOKES)


def pings():
    out, age = np.zeros(N), np.arange(SR // 4) / SR
    for s, db, hz, t60 in STEEL_PINGS:
        beat = 1 + .3 * np.cos(2 * np.pi * 45 * age)
        level = field_ratio(db - 60 * age / t60) * np.minimum(age / 0.0025, 1)
        out[round(s * SR):][:len(age)] += level * beat * np.sin(2 * np.pi * hz * age)
    return out


def workshop(x):
    t60_s, level_db, wall_cut_hz = 0.27, -6, 1600
    age = np.arange(SR // 2) / SR
    tail = rng.standard_normal(len(age)) * field_ratio(-60 * age / t60_s) * (age > .004)
    dull = filtered(tail, 1, wall_cut_hz)
    tail = dull + (tail - dull) * field_ratio(-120 * age)
    return x + field_ratio(level_db) * signal.fftconvolve(x, tail / np.sqrt(np.sum(tail ** 2)))[:N]


def microphone(x):
    bass_cut_hz, fall_hz, fall_db = 49, 6280, -12.5
    x = filtered(x, 4, bass_cut_hz, "high")
    x = filtered(x, 4, fall_hz) + field_ratio(fall_db) * filtered(x, 4, fall_hz, "high")
    return x + sum((field_ratio(db) - 1) * resonance(x, hz, width) for hz, width, db in MIC_PORTS)


def scene():
    wood = file_landings() + field_ratio(-4.0) * filing() + singing()
    steel = dropped_file() + handle() + vise_body() + pings()
    knocks = file_falls() + vise_knocks() + thuds()
    return (workshop(wood + steel + knocks) + rumble() + rubbing())[None]


def top_cut(x):
    return signal.sosfilt(signal.butter(12, 16810, fs=SR, output="sos"), x)


def record(dry):
    top, cut_hz = .7, 16300
    rounded = top * np.tanh((microphone(dry) + electronics()) / top)
    mix = signal.sosfilt(signal.cheby2(12, 40, cut_hz, fs=SR, output="sos"), rounded)
    return top_cut(mix)


dry = scene()
out = record(dry)
store_pcm(out)
```